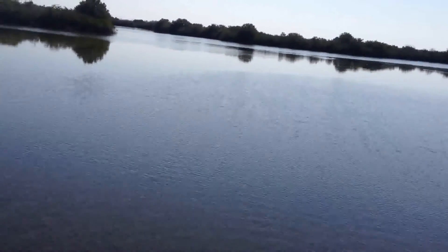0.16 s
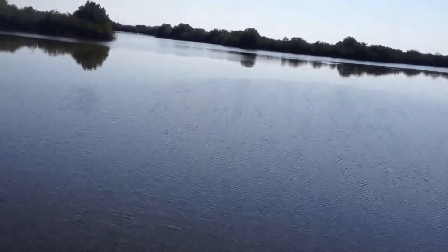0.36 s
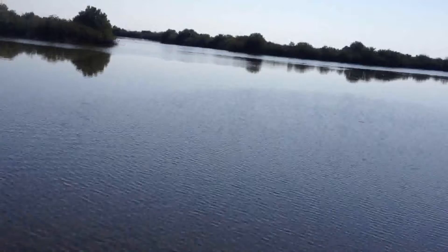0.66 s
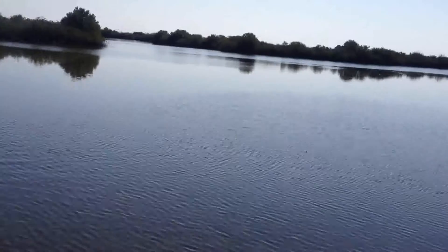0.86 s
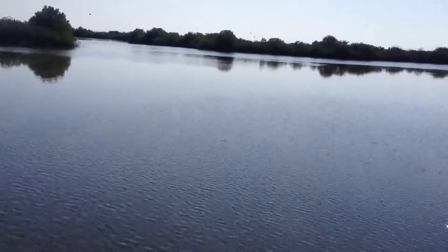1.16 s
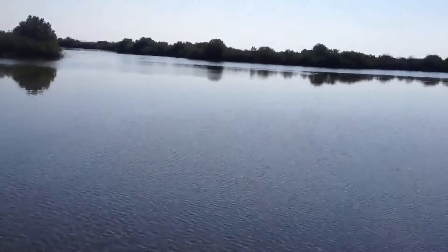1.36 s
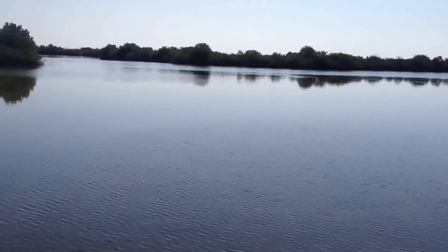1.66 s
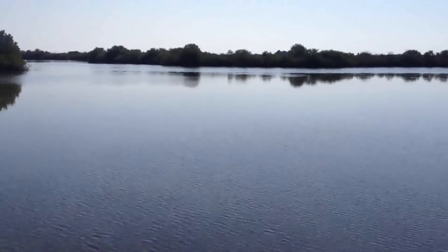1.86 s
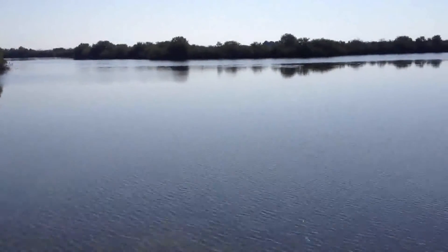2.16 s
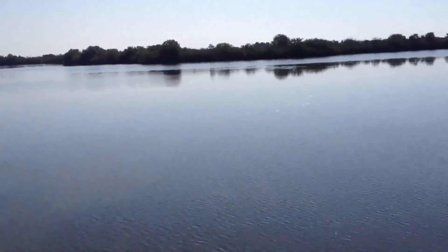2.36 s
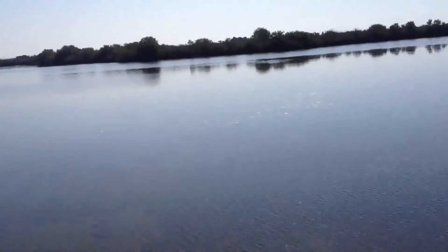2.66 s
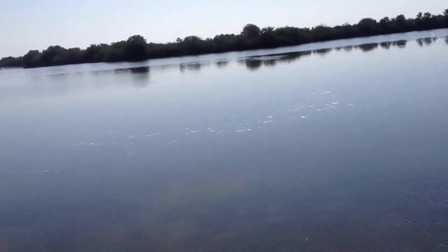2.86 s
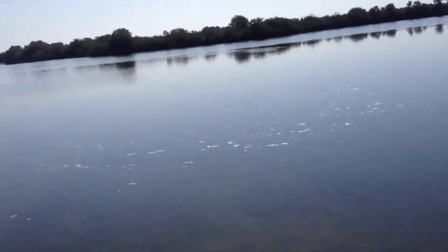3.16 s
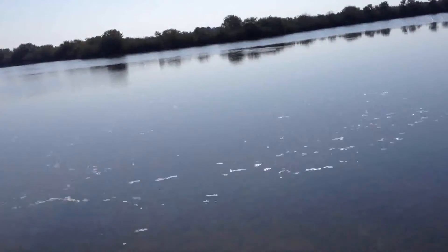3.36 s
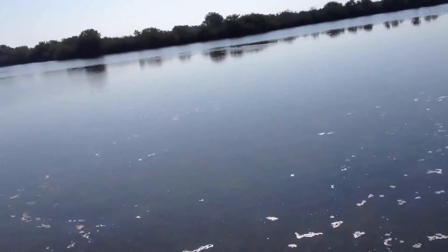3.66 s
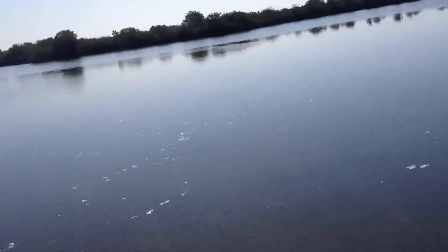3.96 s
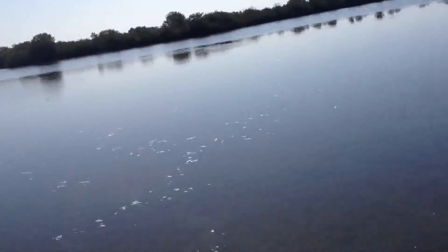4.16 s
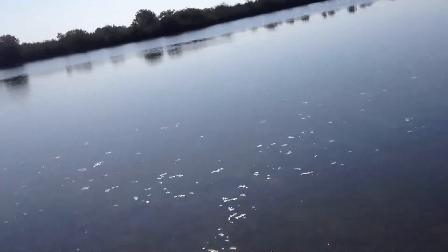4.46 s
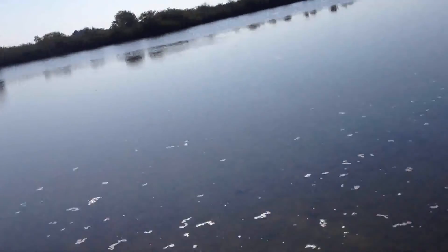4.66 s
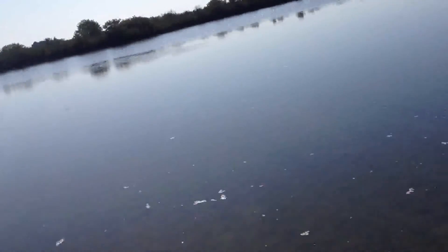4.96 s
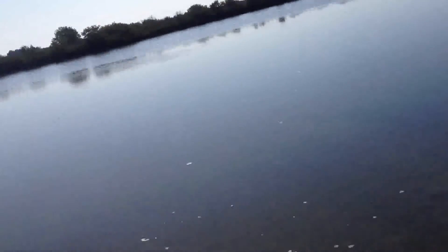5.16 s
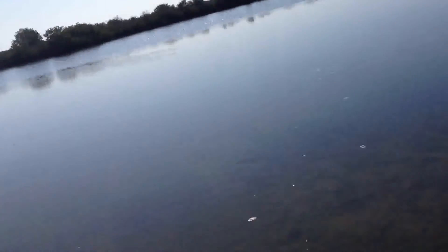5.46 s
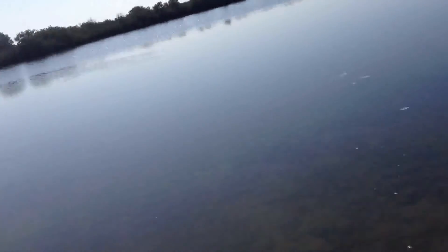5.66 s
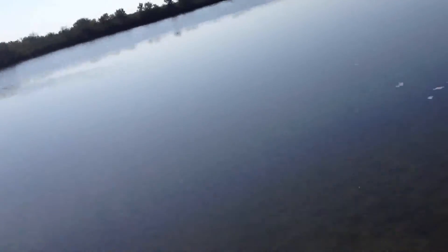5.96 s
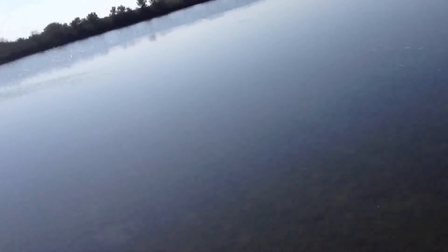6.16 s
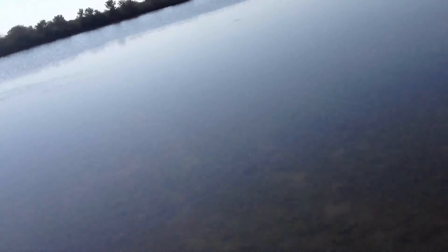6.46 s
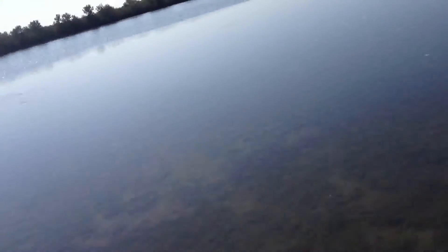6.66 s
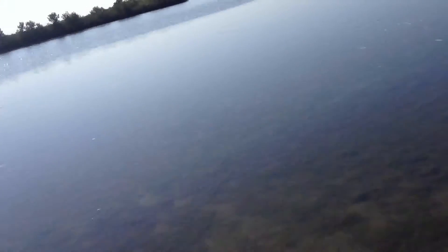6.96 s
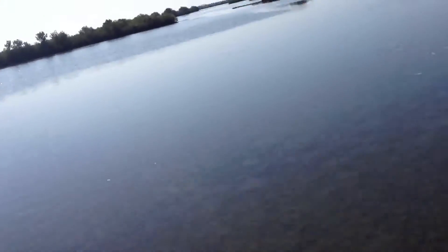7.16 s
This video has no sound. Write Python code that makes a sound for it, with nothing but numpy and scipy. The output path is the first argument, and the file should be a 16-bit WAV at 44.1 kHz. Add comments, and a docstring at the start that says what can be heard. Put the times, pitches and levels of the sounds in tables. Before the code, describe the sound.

Close, exposed microphone on a moving airboat outdoors, with no room echo. The engine hums and rattles steadily while the propeller flutters and its wash roars. As the boat swings round, brief wind thuds interrupt the drone, then after a short lull, crackling gusts strike in quick succession. The engine speeds up a little beneath a near-continuous bright wind hiss, slightly overloaded, which drops away in the last moments.

```python
"""An airboat engine booms as heard from on board; its crank speeds up a little in the second half.
Engine and geared-down propeller are sums of harmonics, beating together; the prop wash is throbbing noise.
As the boat swings round, wind noise strikes the microphone in dull puffs, then longer, brighter gusts, then
a steady tearing hiss; a limiter ducks the drone under it. A brief squeak is a pair of pulsed sines.
A faint noise rumble lies under the drone."""
import sys
import numpy as np
from scipy import signal
from scipy.fft import rfft, irfft, next_fast_len
from scipy.io import wavfile
from scipy.ndimage import uniform_filter1d

SR = 44100
rng = np.random.default_rng(int(sys.argv[2]) if len(sys.argv) > 2 else 0)


def materialize(psi):
    """Save the field psi as 16-bit PCM at rate SR to the path in sys.argv[1].

    A 1-D psi becomes a single channel; in a 2-D psi each row is a channel.
    """
    bounded = np.clip(np.atleast_2d(psi).T, -1, 1)
    quanta = np.round(bounded * 32767).astype(np.int16)
    wavfile.write(sys.argv[1], SR, quanta)


N = 322812

# crankshaft speed: t/s, speed/(turns per s)
CRANK_SPEED = [(0.0, 67.58), (1.6, 67.56), (3.0, 68.27), (4.6, 68.25), (5.2, 69.5), (5.95, 72.45),
               (7.32, 74.95)]
# steady wind between and after the gusts: t/s, relative level/dB
STEADY_WIND = [(4.6, -60), (4.8, -17), (5.68, -17), (5.88, -8.5), (7.0, -7), (7.13, -13), (7.22, -20),
               (7.32, -19)]
# gusts on the microphone: start t/s, length/s, relative level/dB
WIND_GUSTS = [(2.687, 0.017, -11.5), (2.762, 0.0075, 1.3), (2.843, 0.038, -5.5), (3.05, 0.014, -17.5),
              (3.17, 0.014, -10.5), (4.112, 0.0088, -6), (4.18, 0.0069, 1), (4.268, 0.0055, 0),
              (4.376, 0.0082, -13), (4.41, 0.025, -1.5), (4.512, 0.017, -1.8), (4.563, 0.013, -2.8),
              (4.725, 0.026, -1.5), (4.765, 0.13, -2.2), (4.917, 0.043, -3.5), (4.988, 0.03, -3),
              (5.033, .027, -5), (5.07, 0.022, -3.5), (5.139, .17, -2), (5.31, 0.084, -3.3),
              (5.405, 0.21, -3.5), (5.634, .012, -5), (5.665, .024, -4.5), (5.704, 0.091, -4),
              (5.828, 0.027, -4.5), (7.252, 0.013, -10.5), (7.293, 0.02, -5)]
# how squarely the wind meets the microphone: t/s, facing (0 glancing to 1 head-on)
WIND_FACING = [(4.55, 0.063), (4.8, 0.82), (5.1, 0.56), (5.25, 0.9), (7.0, 0.97), (7.32, 0.67)]
GEAR_RATIO = .425  # propeller turns per crank turn


def from_db(db):
    """Level to amplitude: 20 dB is a factor of ten."""
    return 10 ** (np.asarray(db) / 20)


def rms_one(x):
    """Normalise by the root mean square, the measure of mean power."""
    return x / np.sqrt(np.mean(x ** 2) + 1e-20)


def in_time(rows):
    """Linear interpolation of each column of a curve, sample by sample."""
    s, *columns = np.transpose(rows)
    return [np.interp(np.arange(N) / SR, s, c) for c in columns]


def at_hz(points, hz):
    """Read a spectrum by interpolation on a log-frequency axis."""
    f, level = np.transpose(points)
    return np.interp(np.log(np.maximum(hz, 1)), np.log(f), level)


def drift(rate):
    """Slow random motion of rms 1: white noise through two equal low-pass poles at rate (Hz)."""
    step = 40  # samples between drawn values
    pole = np.exp(-2 * np.pi * rate * step / SR)
    white = rng.standard_normal(N // step + 2002)
    slow = signal.lfilter([1], [1, -2 * pole, pole * pole], white)[2000:]  # skip the filter's start
    return np.interp(np.arange(N) / step, np.arange(len(slow)), rms_one(slow))


def noise(spectrum):
    """Steady noise of rms 1: a white spectrum weighted by the given spectral density."""
    size = next_fast_len(N)
    white = rfft(rng.standard_normal(size))
    hz = np.arange(len(white)) * SR / size
    coloured = irfft(white * from_db(at_hz(spectrum, hz)), size)
    return rms_one(coloured[:N])


def tone(turns):
    """Simple harmonic motion of rms 1 with a random starting phase."""
    return np.sqrt(2) * np.sin(2 * np.pi * (turns + rng.random()))


def shaft_tones(orders, turns, state, waver_db, waver_rate):
    """Rotating sources radiate multiples of the shaft rate; balance follows the stage, each wavers alone."""
    out = 0
    for multiple, *levels in orders:
        level = np.interp(state, np.arange(len(levels)), levels)
        waver = waver_db * drift(waver_rate)
        out = out + from_db(level + waver) * tone(multiple * turns)
    return out


def engine(turns, state, load):
    """Periodic firing gives harmonics; unequal cylinders add half orders, repeating every second turn."""
    # engine tones: multiple of crank rate, then relative level/dB cruising, turning, speeding up, open throttle
    engine_orders = [(2, -29, -32, -41, -35), (3, -9, -11, -23, -22), (4, -29, -25, -27, -22),
                     (5, -33, -26, -28, -32), (6, -28, -24, -35, -45), (7, -40, -35, -46, -37),
                     (8, -39, -40, -43, -41), (9, -45, -43, -45, -43), (11, -41, -41, -46, -52),
                     (12, -42, -52, -45, -57), (16, -41, -47, -55, -53), (19, -36, -36, -55, -51),
                     (21, -47, -42, -54, -50)]
    # exhaust rattle, a line at every half turn of the crank: f/Hz, relative level per line/dB
    rattle_lines = [(200, -30), (450, -42), (700, -44), (1200, -52.5), (1500, -53), (2000, -56)]
    boom = shaft_tones(engine_orders, turns, state, waver_db=1.14, waver_rate=14.0)
    loose_turns = turns + 0.0045 * drift(12.4)
    rattle = 0
    for multiple in np.arange(7, 54) / 2:
        # each line's level is read at its frequency for the opening speed
        level = at_hz(rattle_lines, multiple * CRANK_SPEED[0][1]) + rng.normal(0, 0.8)
        rattle = rattle + from_db(level) * tone(multiple * loose_turns)
    # the engine booms louder under load: 1.47 dB per turn/s^2 of crank acceleration
    return from_db(1.32 + 1.47 * load) * (boom + rattle * from_db(-2.5 * state))


def propeller(turns, state, throttle, bank):
    """Blades cutting uneven air radiate harmonics of the shaft rate, wavering more than the engine's."""
    # tones: multiple of propeller rate, then relative level/dB cruising, turning, speeding up, open throttle
    prop_orders = [(5, -20, -27, -31, -23), (6, -28, -28, -34, -27), (8, -31, -43, -36, -31),
                   (9, -47, -42, -49, -44), (10, -36, -34, -40, -45), (11, -37, -47, -50, -52),
                   (13, -33, -41, -49, -38), (16, -43, -40, -44, -34), (18, -39, -42, -49, -43),
                   (24, -39, -39, -45, -55)]
    uneven_turns = GEAR_RATIO * turns + 0.0056 * drift(9.9)
    tones = shaft_tones(prop_orders, uneven_turns, state, waver_db=2.07, waver_rate=3.0)
    # the tones sink as the boat banks into the turn
    return from_db(2 + 3.5 * throttle - 3.5 * bank) * tones


def wash(spectrum, turns, crank_throb=0.061, blade_throb=0.012, churn_db=0.35):
    """Turbulence behind the propeller is noise, amplitude-modulated by the crank and the blades."""
    throb = 1 + crank_throb * tone(turns) + blade_throb * tone(2 * GEAR_RATIO * turns)
    return noise(spectrum) * rms_one(throb) * from_db(churn_db * drift(28))


def roar(turns, throttle, bank):
    """Low turbulent noise of the wash, louder in the bank."""
    # relative spectral density: f/Hz, level per Hz/dB
    roar_spectrum = [(90, -13), (135, -3.5), (220, -0.5), (380, 0.5), (540, -4.5), (750, -10.5),
                     (1200, -11), (3000, -53)]
    return from_db(-21 - 1.3 * throttle + 3.5 * bank) * wash(roar_spectrum, turns)


def rush(turns, throttle, bank):
    """Higher turbulent noise of the wash, slightly louder in the bank."""
    # relative spectral density: f/Hz, level per Hz/dB
    rush_spectrum = [(200, -14), (600, -1.5), (900, -2), (1400, 0), (1700, -5), (2100, -10), (3200, -13),
                     (4300, -10.5), (5100, -8), (7000, -21), (10000, -25)]
    return from_db(-23 + 0.3 * throttle + 0.8 * bank) * wash(rush_spectrum, turns)


def low_rumble():
    """Low-frequency noise of slowly varying level, faint under the drone."""
    # relative spectral density: f/Hz, level per Hz/dB
    rumble_spectrum = [(20, -8), (50, -4.5), (68, 5), (80, 1), (105, 4), (140, -25), (400, -72)]
    # t/s, rms level/dB
    rumble_level = [(0, -38.5), (4, -41.5), (5.2, -49), (7.32, -44)]
    return from_db(in_time(rumble_level)[0]) * noise(rumble_spectrum)


def wind(attack_s=0.0052, release_s=0.0065, flutter_db=1.18, flutter_rate=70,
         sizzle_db=-10, surge_db=1.37, surge_rate=14):
    """Turbulence at the microphone opening is noise; the more squarely the air hits, the brighter."""
    # hiss of a glancing gust, relative spectral density: f/Hz, level per Hz/dB
    dull_spectrum = [(100, 10), (400, -2.5), (900, 8), (1700, 7.5), (2600, 3.5), (3500, 1), (4600, 2.5),
                     (5300, 2.5), (6500, -14.5), (8500, -30), (11000, -47)]
    # hiss of a square gust, relative spectral density: f/Hz, level per Hz/dB
    bright_spectrum = [(100, -3.5), (400, -0.5), (900, -11), (1500, -6), (2500, 1.5), (3700, 1.5),
                       (4600, 4.5), (5300, -0.5), (6300, -8.5), (8000, -18), (11000, -34)]
    # sizzle of the hardest gusts, relative spectral density: f/Hz, level per Hz/dB
    sizzle_spectrum = [(1000, -28), (3000, 11), (5000, -5), (6500, -6), (9000, -3), (11000, -9)]
    t = np.arange(N) / SR
    power = from_db(in_time(STEADY_WIND)[0]) ** 2
    for start, length, gust_db in WIND_GUSTS:
        # ramps are half-way at start and end; attack and release are half their lengths
        rise = (t - start) / attack_s
        fall = (start + length - t) / release_s
        shape = np.clip(.5 + np.minimum(rise, fall) / 2, 0, 1)
        power = power + from_db(gust_db) ** 2 * shape ** 3
    bright_power = power * np.clip(in_time(WIND_FACING)[0], 0, 1)
    dull_power = np.maximum(power - bright_power, 0)
    hiss = np.sqrt(dull_power) * noise(dull_spectrum) + np.sqrt(bright_power) * noise(bright_spectrum)
    # the finest eddies grow twice as fast in dB as the rest
    sizzle = from_db(sizzle_db) * bright_power * noise(sizzle_spectrum)
    return (hiss + sizzle) * from_db(flutter_db * drift(flutter_rate) + surge_db * drift(surge_rate))


def crackle(x, crackle_db=1.0, grain_rate=350):
    """Small eddies modulate the amplitude of a hiss, in grains of a millisecond or so."""
    return x * rms_one(from_db(crackle_db * drift(grain_rate)))


def pressure(swell_s=0.0057):
    """Dynamic pressure: the wind also shoves the diaphragm in slow swells, mostly below the low cut."""
    t = np.arange(N) / SR
    swells = np.zeros(N)
    for start, length, gust_db in WIND_GUSTS:
        # middling gusts push hardest, as stronger ones break up into hiss
        push = 1.2 * np.exp(-((gust_db + 8.5) / 6.5) ** 2)
        # each swell peaks at the end of its gust
        phase = np.clip((t - start - length) / (length / 2 + swell_s), -1, 1)
        swells += push * np.cos(np.pi / 2 * phase) ** 2
    # a square hit keeps only 0.17 of a glancing gust's push
    share = np.interp(in_time(WIND_FACING)[0], [0, 1], [1, 0.17])
    # the steady wind leans on the diaphragm too
    return share * swells + 0.25 * from_db(in_time(STEADY_WIND)[0])


def squeak(middle_s=3.548, length_s=.016):
    """Two close partials share one Gaussian envelope, a brief squeak on board."""
    # f/Hz, relative level/dB
    squeak_partials = [(2350, -25), (2850, -27)]
    t = np.arange(N) / SR
    swell = np.exp(-(2 * (t - middle_s) / length_s) ** 2)
    return swell * sum(from_db(level) * tone(hz * t) for hz, level in squeak_partials)


def scene():
    """Superposition: engine, propeller and wash share one crank speed; wind acts at the microphone."""
    # crank speed/(turns per s) of the stages: cruising, in the turn, speeding up, throttle open
    stage_speeds = [67.55, 68.25, 69.2, 73.0]
    speed, = in_time(CRANK_SPEED)
    state = np.interp(speed, stage_speeds, np.arange(len(stage_speeds)))
    throttle = np.clip(state - 1, 0, 1)
    # crank acceleration averaged over half a second (turns/s^2)
    load = uniform_filter1d(np.gradient(speed) * SR, SR // 2)
    bank_s, bank_width_s = 2.34, 0.57
    bank = np.exp(-((np.arange(N) / SR - bank_s) / bank_width_s) ** 2)
    turns = np.cumsum(speed * (1 + 0.00043 * drift(5.1))) / SR
    drone = engine(turns, state, load) + propeller(turns, state, throttle, bank)
    prop_wash = roar(turns, throttle, bank) + rush(turns, throttle, bank)
    wind_hiss = from_db(-2.0) * crackle(wind())
    return (drone + prop_wash + wind_hiss + pressure() + squeak())[None]


def port_ring(x, ring_hz=4950, width_hz=440):
    """The microphone's port is a resonator: a two-pole band-pass."""
    r = np.exp(-np.pi * width_hz / SR)
    zeros = np.array([1, 0, -1]) * (1 - r * r) / 2
    poles = [1, -2 * r * np.cos(2 * np.pi * ring_hz / SR), r * r]
    return signal.lfilter(zeros, poles, x)


def limiter(x, ceiling=0.8, release_db_per_s=50, smooth_s=0.0043, sense_s=0.00013):
    """Gain reduction: a fast drop over the ceiling, a slow return; smoothing lets brief spikes through."""
    height = uniform_filter1d(np.abs(x), max(int(sense_s * SR), 1))
    over = 20 * np.log10(np.maximum(height / ceiling, 1))
    recovery = release_db_per_s * np.arange(N) / SR
    # the largest excess so far, falling at the release rate
    cut = np.maximum.accumulate(over + recovery, axis=-1) - recovery
    return x * from_db(-uniform_filter1d(cut, max(int(smooth_s * SR), 1)))


def record(dry):
    """Signal chain in series: port resonance, limiter, wind filter, added rumble, clipping, top cut."""
    limited = limiter(dry + 0.89 * port_ring(dry))
    # the wind filter comes after the limiter, so a puff's pressure ducks the drone without a thump
    low_cut = signal.butter(8, 118, "high", fs=SR, output="sos")
    thinned = signal.sosfilt(low_cut, limited)
    clipped = np.clip(thinned + low_rumble(), -.93, .93)
    top_cut = signal.ellip(12, .2, 80, 11150, fs=SR, output="sos")
    return signal.sosfilt(top_cut, clipped)


dry = scene()
out = record(dry)
materialize(out)
```